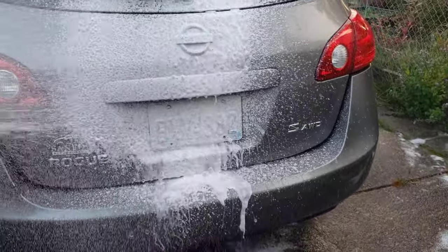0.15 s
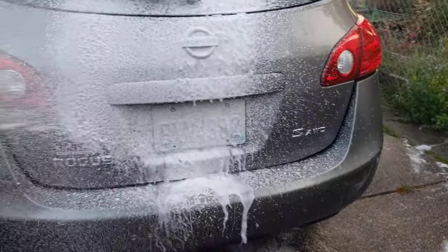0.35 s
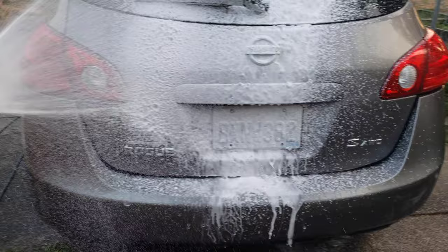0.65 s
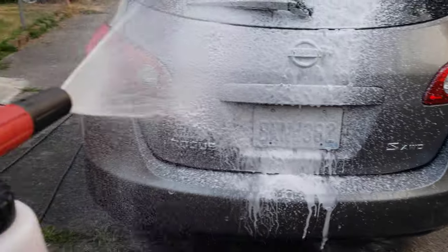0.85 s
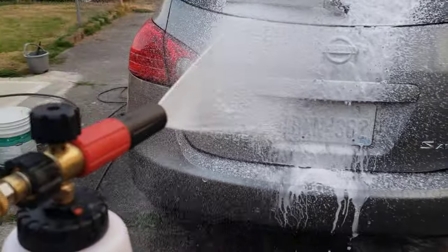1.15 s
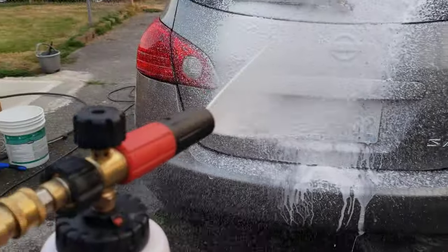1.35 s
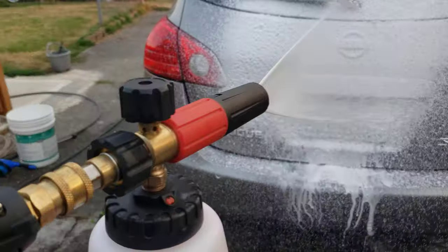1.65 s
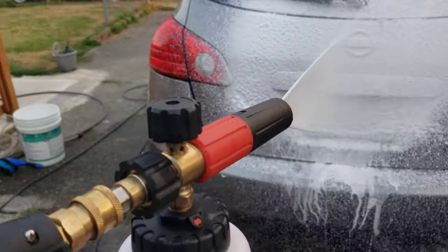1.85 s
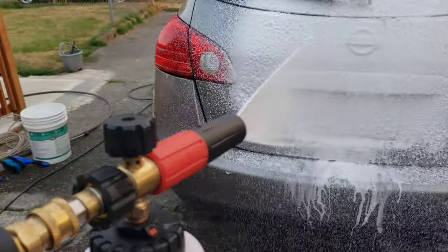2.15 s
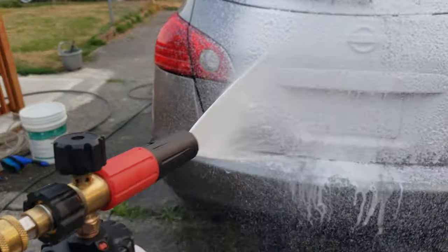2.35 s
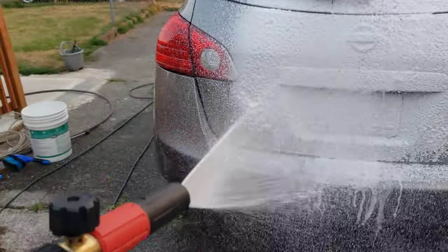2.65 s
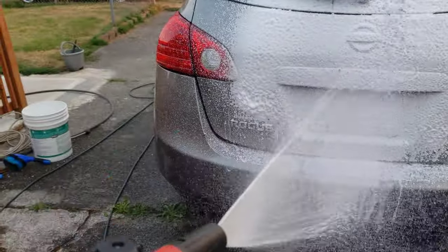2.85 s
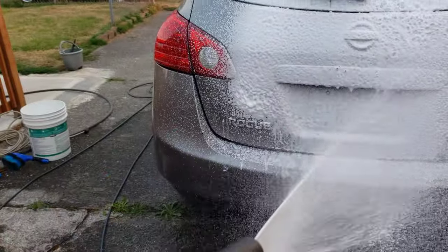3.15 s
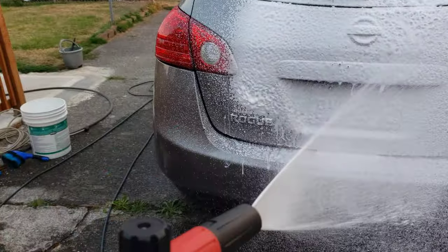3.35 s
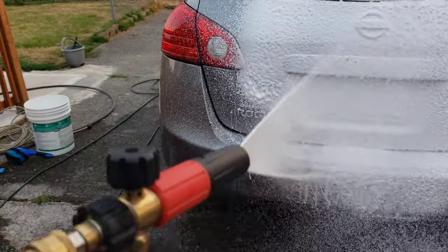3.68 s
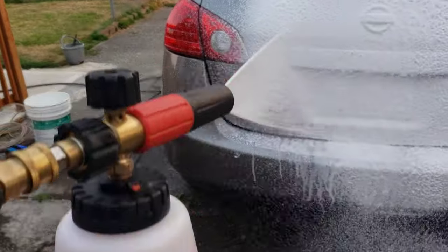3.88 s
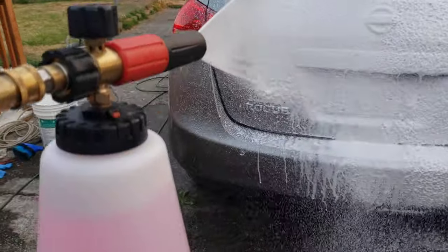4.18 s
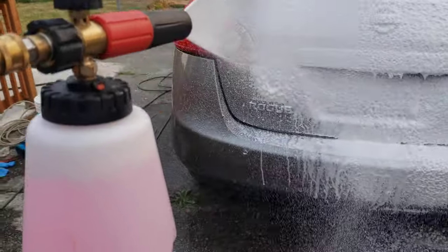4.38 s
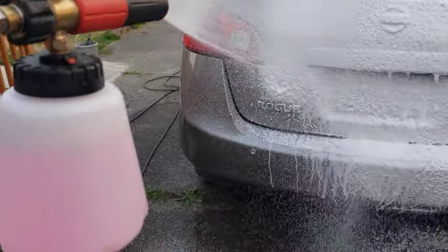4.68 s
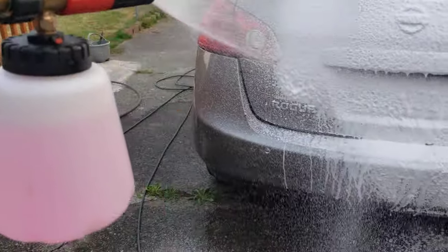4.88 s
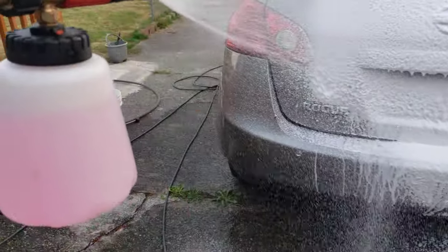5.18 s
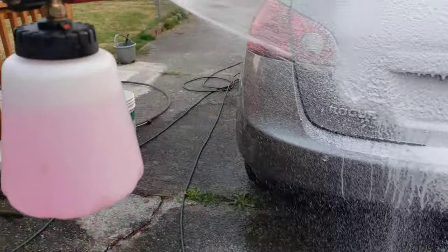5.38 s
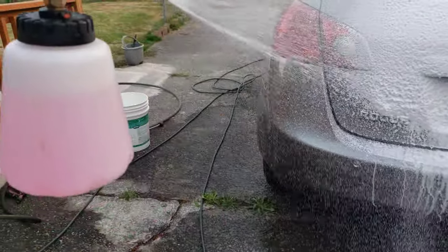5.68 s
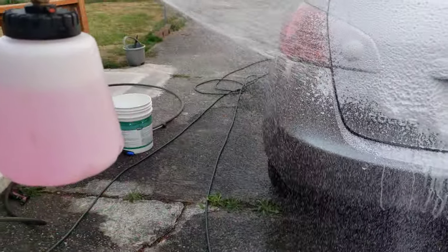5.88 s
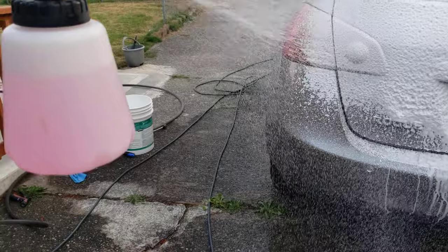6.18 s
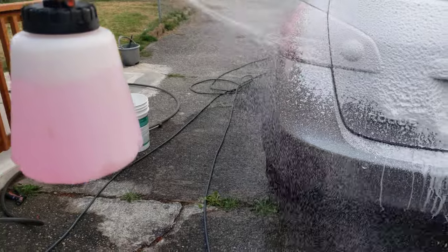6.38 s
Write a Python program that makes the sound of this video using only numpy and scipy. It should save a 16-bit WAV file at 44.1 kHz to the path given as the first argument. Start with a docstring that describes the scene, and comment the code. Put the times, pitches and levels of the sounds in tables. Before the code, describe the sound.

A continuous loud foam spray hisses against a car, close to a stereo microphone outdoors. It begins off to the left, bright with fine mist and briefly hollowed by short dips, then swings to the centre within two seconds and settles. A ringing tinge colours the hiss. Beneath it an electric pressure washer hums and whines, its high thin tone fading in and out. Near the end a faint soft bump occurs.

```python
"""Pressure washer and foam gun

An electric pressure washer runs in a driveway while a foam gun sprays a car close to two microphone ports.
The spray is noise shaped in short-time spectra; as the gun swings from far left to the front and
a little back, its delay between the ports changes. Under it, sines locked to the shafts make the motor's
whine and the geared three-piston pump's hum, with a supply buzz, a low fuzzy hum and soft low bumps."""
import sys
import numpy as np
from scipy import signal
from scipy.io import wavfile
from scipy.ndimage import uniform_filter1d

SR = 44100
rng = np.random.default_rng(int(sys.argv[2]) if len(sys.argv) > 2 else 0)


def dump_mix(stems):
    """Bounce the given channels to the path in sys.argv[1] as a 16-bit WAV at rate SR."""
    frames = np.atleast_2d(stems).T  # one column per channel
    limited = np.clip(frames, -1, 1)  # hard clip at full scale
    pcm = np.round(limited * 32767).astype(np.int16)
    wavfile.write(sys.argv[1], SR, pcm)


N = 287973


def gain_of(db):
    """Decibels to amplitude."""
    return 10 ** (np.asarray(db) / 20)


def evened(x):
    """Scales to rms 1."""
    return x / np.sqrt(np.mean(x ** 2) + 1e-20)


def read(points, hz):
    """Reads a table on a log-frequency axis."""
    f, value = np.transpose(points)
    return np.interp(np.log(hz + 1), np.log(f + 1), value)


def columns(rows, t):
    """Every column of a curve at the times t."""
    s, *rest = np.transpose(rows)
    return np.array([np.interp(t, s, c) for c in rest])


def drift(t, top_hz):
    """Slow chance of rms 1: sines of random phase, the slowest largest."""
    rates_hz = np.geomspace(top_hz / 20, top_hz, num=16)
    phases = rng.random(len(rates_hz))
    return evened(sum(np.sin(2 * np.pi * (k * t + p)) / np.sqrt(k) for k, p in zip(rates_hz, phases)))


def sample_drift(t, top_hz):
    """Drift computed every 256 samples and interpolated."""
    coarse = t[::256]
    return np.interp(t, coarse, drift(coarse, top_hz))


def blobs(frames, bins, wide, long):
    """Random hills of rms 1 over frequency and time, so many bins wide and frames long."""
    x = rng.standard_normal((bins, frames))
    x = uniform_filter1d(x, size=wide, axis=0)
    return evened(uniform_filter1d(x, size=long, axis=1))


def tone(turns, left_db, right_db, lead_rad):
    """One sine at both ports, levels in dB rms, the left port leading in phase."""
    angle = 2 * np.pi * (turns + rng.random())
    left = gain_of(left_db) * np.sin(angle + lead_rad)
    right = gain_of(right_db) * np.sin(angle)
    return np.sqrt(2) * np.array([left, right])


def bumps():
    """Soft low bumps: a few cycles of bass under a raised-cosine envelope."""
    # Each row: start in seconds, envelope peak in dB (mean of the ports), frequency in Hz, length in seconds.
    bump_rows = [(5.488, -37, 92, 0.13), (5.608, -57, 65, .06)]
    out = np.zeros(N)
    for start_s, db, hz, length_s in bump_rows:
        t = np.arange(round(length_s * SR)) / SR
        pulse = gain_of(db) * np.hanning(len(t)) * np.sin(2 * np.pi * hz * t)
        out[round(start_s * SR):][:len(t)] += pulse
    return out * gain_of([[1.5], [-1.5]])


def low_hum(t):
    """Low hum, fuzzy because its frequency and level wander fast."""
    # Each row: time in seconds, top level at the left port in dB.
    hum_rows = [(0, -50), (1.5, -57.7), (2, -50), (3, -51.5), (4.5, -59), (5.5, -48.5), (6, -53),
                (6.52, -52)]
    centre_hz, wander_hz, flutter_db = 61.4, 5.0, 3
    hum_db = columns(hum_rows, t)[0] - flutter_db * abs(sample_drift(t, 14))  # flutters below its top
    turns = np.cumsum(centre_hz + wander_hz * sample_drift(t, 13)) / SR
    return tone(turns, hum_db, hum_db - 5.0, .1)


def supply_buzz(t, waver_db):
    """Wavering buzz at four times the supply current's frequency."""
    buzz_hz, left_db, right_db = 239.8, -50, -57
    return gain_of(waver_db * sample_drift(t, 7.2)) * tone(buzz_hz * t, left_db, right_db, .3)


def rotor_turns(t):
    """Turns of the motor's rotor: its smoothed speed, summed."""
    # Each row: time in seconds, rotor speed in Hz.
    speed = [(0, 291.28), (.32, 289.31), (.64, 287.87), (.96, 287.96), (2.4, 290.05), (3.36, 292.24),
             (3.84, 292.84), (5.76, 294.12), (6.52, 294.23)]
    return np.cumsum(uniform_filter1d(columns(speed, t)[0], size=8000)) / SR


def weak_orders(t, turns, rows, waver_db):
    """Weak multiples of a shaft's speed, each wavering on its own."""
    out = np.zeros((2, len(t)))
    for multiple, left_db, right_db, lead_rad in rows:
        level_db = waver_db * sample_drift(t, 4) + 0.6
        out += gain_of(level_db) * tone(multiple * turns, left_db, right_db, lead_rad)
    return out


def pump_hum(t, pump, waver_db):
    """Three piston strokes a turn give a beat and its octave; other pump orders are weak."""
    # Each row: time in seconds, beat at the left port in dB, its octave at the left port in dB.
    beat = [(0, -39, -45), (.48, -46, -40.5), (2.24, -43, -40), (2.88, -41.5, -40.3), (5.44, -39.5, -40.5),
            (6.08, -38, -37), (6.52, -39, -37)]
    # Each row: multiple of pump speed, left level in dB, right level in dB (both before waver and
    # a 0.6 dB lift), left lead in radians.
    pump_orders = [(4, -51, -54, .5), (5, -55, -59, .5), (7, -54, -56, .9), (9, -45, -50, .9),
                   (10, -52, -56, 1.1), (11, -50, -53, 1.3), (12, -52, -54, 1.9), (14, -48, -53, 2.0),
                   (16, -54, -58, 2.2)]
    beat_db, octave_db = columns(beat, t)
    out = tone(3 * pump, beat_db, beat_db - 3.6, .55)
    out += tone(6 * pump, octave_db, octave_db - 5.8, .7)
    return out + weak_orders(t, pump, pump_orders, waver_db)


def motor_whine(t, rotor, pump, waver_db, load=0.41):
    """Commutator orders fade in and out, two of them loaded by each pump turn; other rotor orders are weak."""
    # Each row: time in seconds, 22nd order left in dB, 22nd right in dB, 32nd left in dB, 33rd left in dB
    # (22nd and 33rd before loading).
    whine = [(0, -38, -51, -54, -54), (.32, -31, -49, -55, -50), (.6, -37.5, -47, -57, -61),
             (.85, -39, -52, -55, -46), (1.2, -36.5, -47, -52, -49), (1.7, -31.5, -47, -48, -47),
             (2.02, -41, -35, -43, -59), (2.24, -32, -42, -44, -50), (2.46, -39, -51, -47, -57),
             (2.8, -29.5, -52, -47.5, -53), (3.16, -42, -56, -45, -43), (3.42, -32.5, -46, -47, -51),
             (3.97, -41, -42, -52, -54), (4.42, -35, -52, -56, -48), (4.64, -34.5, -42, -57, -51),
             (4.93, -55, -41, -59, -47), (5.25, -48, -45, -56, -50), (5.48, -35.5, -61, -52, -44),
             (5.76, -44, -51, -46, -57), (6.12, -35, -57, -57, -45), (6.38, -34, -54, -49, -48),
             (6.52, -42, -49, -51, -48)]
    # Each row: multiple of rotor speed, left level in dB, right level in dB (both before waver and
    # a 0.6 dB lift), left lead in radians.
    rotor_orders = [(1, -48, -53, .6), (1.23, -56, -60, .6), (1.41, -52, -57, .7), (3.07, -50, -55, 1.5),
                    (20, -53, -63, -.7), (21, -50, -61, 1.9), (23, -51, -58, .6), (34, -55, -62, -.7),
                    (35, -62, -64, 1.9), (44, -62, -58, -.8)]
    left_db, right_db, db32, db33 = columns(whine, t)
    loading = 1 + load * np.sin(2 * np.pi * pump) + .3 * load * np.sin(4 * np.pi * pump)
    out = loading * tone(22 * rotor, left_db, right_db, -2.9)
    out += tone(32 * rotor, db32, db32 - 8.6, .1)
    out += loading * tone(33 * rotor, db33, db33 - 4.8, -.4)
    return out + weak_orders(t, rotor, rotor_orders, waver_db)


def washer(waver_db=2.5, rotor_turns_per_pump_turn=50 / 11):
    """The motor drives the pump through gears, so their tones move together; hum and buzz lie under them."""
    t = np.arange(N) / SR
    rotor = rotor_turns(t)
    pump = rotor / rotor_turns_per_pump_turn
    out = low_hum(t) + supply_buzz(t, waver_db)
    return out + pump_hum(t, pump, waver_db) + motor_whine(t, rotor, pump, waver_db)


def part_weights(hz):
    """Share of each spray part at each frequency; neighbours blend."""
    # Each entry: centre in Hz of barrel ring, low, middle and high splash, mist.
    parts_hz = [1930, 2600, 3500, 4100, 10700]
    # base, low wash, ring and three splash parts, sizzle, mist
    places_hz = [300, 750, *parts_hz[:-1], 5800, parts_hz[-1]]
    weights = np.array([read(list(zip(places_hz, row)), hz) for row in np.eye(len(places_hz))]).T
    return weights ** 3 / (weights ** 3).sum(1, keepdims=True)  # flat tops, short blends


def part_levels(t, lead_us, near_wash=0.39, near_sizzle=0.36):
    """Level of each part in dB, and the lift in dB of a close nozzle."""
    # Each row: time in seconds, low, middle and high splash in dB, mist in dB, all over the steady hiss.
    spray_rows = [(0, 1, -4, -1.5, 11.5), (.28, 2.5, -9, -5, 9), (.5, 1.5, -0.7, -1, 5.5),
                  (.8, 4.5, -3, -4, 1), (1.1, -3.5, 0.7, 0.5, 0.5), (1.53, .9, 0.8, 1, -0.5),
                  (2.1, 2, 1.8, 0.5, -3.5), (2.4, 0, 1.5, -1.5, -1.5), (2.68, -3, 0.7, 1.5, 0.5),
                  (3.0, 0, 1.5, -3, -1), (3.2, -1.5, -2, -1, -2.2), (3.6, 0, 2, 0.2, -2),
                  (4.1, 1, 0.5, 2.5, -1.3), (4.7, 0.3, 0, 0.5, 0), (5.2, -.5, -.3, -2.5, -1),
                  (5.6, -2, 1, 0.2, -1.5), (6.03, -2.5, -0.5, -1.4, 0.8), (6.52, 1, -2.5, -2, -2.5)]
    *splash_db, mist_db = columns(spray_rows, t)
    ring_db = 0.3 - 0.5 * lead_us / 100  # dims as the gun moves left
    parts_db = [part + 0.19 * drift(t, 8) for part in [ring_db, *splash_db]]
    near_db = np.maximum(mist_db, 0)  # a close nozzle also lifts the low wash and the sizzle
    levels_db = [0 * near_db, near_wash * near_db, *parts_db, near_sizzle * near_db, mist_db]
    return levels_db, near_db


def resonance(hz, centre_hz, width_hz, peak_db):
    """A peak in dB over frequency, half its height at the edges of its width."""
    return peak_db / (1 + (2 * (hz[:, None] - centre_hz) / width_hz) ** 2)


def barrel_ring(hz, t):
    """The gun barrel rings: a broad, wandering resonance with a steady narrow core."""
    # One row: centre in Hz, width in Hz, peak over the hiss in dB.
    barrel = (1742, 200, 4.2)
    # One row: centre in Hz, width in Hz, peak over the ring in dB.
    core = (1800, 47, 2.2)
    ring_hz, width_hz, ring_db = barrel
    ring_hz = ring_hz * (1 + 0.0055 * drift(t, 7.8))
    return resonance(hz, ring_hz, width_hz, ring_db) + resonance(hz, *core)


def crest(hz, t):
    """A bright crest moves through the splash as the jet finds other panels."""
    # Each row: time in seconds, crest centre in Hz.
    crest_rows = [(0, 2930), (.5, 3200), (.7, 3550), (1.0, 4170), (1.3, 3400), (2.3, 3430), (2.7, 3100),
                  (3.2, 3200), (3.45, 3750), (4.2, 3920), (4.8, 3870), (5.6, 4300), (6.52, 4420)]
    width_hz, peak_db = 330, 2
    return resonance(hz, columns(crest_rows, t), width_hz, peak_db)


def dropouts(hz, t):
    """Depth in dB by which the middle of the splash drops out briefly while the gun swings."""
    # Each row: start in seconds, end in seconds, centre in Hz, width in Hz, depth in dB.
    dropout_rows = [(0.001, 0.132, 3420, 1100, 11), (0.5, 0.59, 3600, 900, 12),
                    (0.77, 0.886, 3750, 1000, 10)]
    depth = np.zeros((len(hz), len(t)))
    for start_s, end_s, centre_hz, width_hz, depth_db in dropout_rows:
        gone = np.clip(np.minimum(t - start_s, end_s - t) / 0.014 + .5, 0, 1)
        depth += depth_db * np.outer(np.exp(-(2 * (hz - centre_hz) / width_hz) ** 4), gone)
    return depth


def roughness(hz, frames, mist_weight, patchy_db=0.86, ridge_db=1.96, sputter_db=0.76):
    """Random level changes in dB: sputtering mist, broad patches, and narrow ridges that change slowly."""
    sputter = evened(uniform_filter1d(rng.standard_normal(frames), size=2))  # foam leaves in slugs
    airy = np.clip(hz / 1500, 0, 1)[:, None]  # the bass stays even
    patches = patchy_db * blobs(frames, len(hz), wide=14, long=12)
    ridges = ridge_db * blobs(frames, len(hz), wide=3, long=70)
    return sputter_db * np.outer(mist_weight, sputter) + airy * (patches + ridges)


def port_noise(hz, lead_us, mist_weight, near_db, near_same=0.011):
    """Random spectra for two ports, partly alike, the right one delayed by the aim of the gun."""
    # Each row: frequency in Hz, likeness of the ports 0-1.
    likeness = [(60, 0.97), (600, 0.92), (1100, 0.8), (1800, 0.71), (3600, 0.9), (4800, 0.63), (5700, 0.3),
                (7200, 0.34), (8200, 0.058), (11000, 0.043), (16000, 0.092)]
    # Each row: frequency in Hz, left lead in radians on top of the delay.
    lead_rows = [(60, -0.0011), (1000, 0.34), (1700, 0.15), (2300, -0.61), (3100, -0.45), (3500, 0.045),
                 (4600, 0.52), (6000, -0.5)]
    a, b, c, d = rng.standard_normal((4, len(hz), len(lead_us)))
    # a close nozzle sends more of its mist straight to both ports
    same = read(likeness, hz)[:, None] + near_same * np.outer(mist_weight, near_db)
    same = np.clip(same, 0, 1)
    lag_rad = 2 * np.pi * np.outer(hz, lead_us) / 1e6 + read(lead_rows, hz)[:, None]
    left = a + 1j * b
    right = np.exp(-1j * lag_rad) * same * left + np.sqrt(1 - same ** 2) * (c + 1j * d)
    return np.array([left, right])


def spray():
    """Foam spray: random short-time spectra shaped by level, ring, splash and aim, then overlap-added."""
    # Each row: time in seconds, lead of the gun's sound at the left port in microseconds.
    aim = [(0, 372), (.3, 380), (.47, 353), (1.1, 122), (1.53, 49), (1.9, 8), (2.1, 20), (2.4, 87),
           (2.62, 108), (2.78, 100), (3.13, 36), (3.55, 36), (4.35, 71), (4.94, 113), (5.2, 123),
           (5.56, 122), (6.03, 164), (6.32, 163), (6.52, 152)]
    # Steady hiss at each port. Each row: frequency in Hz, level in dB per Hz.
    left_port = [(20, -76), (55, -72.5), (100, -75), (250, -68), (520, -67), (600, -58), (1000, -63),
                 (1420, -63.5), (1830, -50.5), (2450, -58), (3660, -53.5), (5580, -67), (7260, -69),
                 (7970, -82.5), (9630, -73), (15700, -74.5)]
    right_port = [(20, -79), (55, -73), (100, -78), (250, -70.5), (520, -69.5), (600, -61), (1160, -69.5),
                  (1490, -68.5), (1770, -57.5), (2110, -63.5), (3600, -52.5), (4440, -59), (5490, -82.5),
                  (7000, -72.5), (8100, -86.5), (11840, -65), (15700, -76)]
    frames, hz = N // 256 + 5, np.fft.rfftfreq(1024, 1 / SR)
    t = np.arange(frames) * 256 / SR
    lead_us = columns(aim, t)[0]
    weights = part_weights(hz)
    mist_weight = weights[:, -1]
    levels_db, near_db = part_levels(t, lead_us)
    field_db = weights @ levels_db + roughness(hz, frames, mist_weight)
    field_db += barrel_ring(hz, t) + crest(hz, t) - dropouts(hz, t)
    # the splash leans left as the gun moves left
    splash_pan_db = 1.5 * lead_us / 100 + 0.7 * drift(t, 5.4)
    pan_db = np.outer(weights[:, 3:6] @ [.4, 1, .8], splash_pan_db)  # low, middle, high splash
    left_db = read(left_port, hz)[:, None] + pan_db / 2
    right_db = read(right_port, hz)[:, None] - pan_db / 2
    spectra = port_noise(hz, lead_us, mist_weight, near_db)
    spectra *= gain_of(field_db + np.array([left_db, right_db]))
    sound = signal.istft(spectra, nperseg=1024, noverlap=768)[1][:, :N]
    return sound * np.sqrt(SR / 1024 * 1.5)  # dB per Hz to amplitude


def scene():
    """Bumps, washer and spray."""
    return bumps() + washer() + spray()


def record(dry):
    """The microphone's bass cut, then the band limit."""
    bass_cut_hz, edge_hz = 55, 15730
    cut = signal.sosfilt(signal.butter(2, bass_cut_hz, "highpass", fs=SR, output="sos"), dry)
    band_limit = signal.firwin(2047, edge_hz, window=("kaiser", 8), fs=SR)
    return signal.oaconvolve(cut, band_limit[None], "same")


dry = scene()
out = record(dry)
dump_mix(out)
```